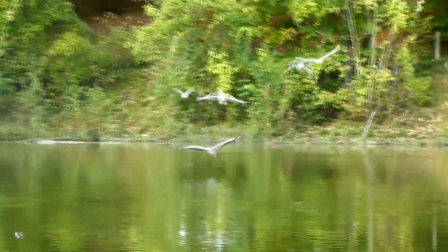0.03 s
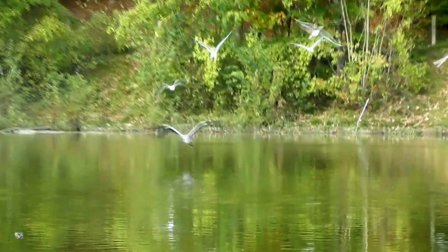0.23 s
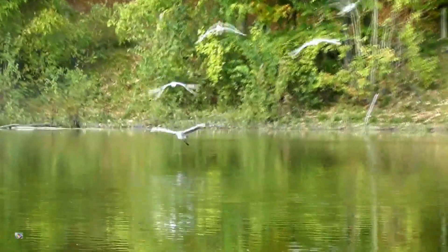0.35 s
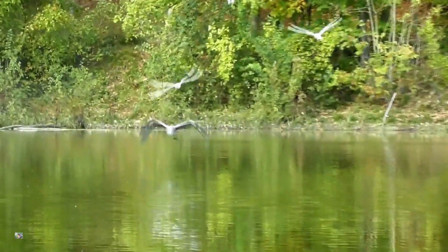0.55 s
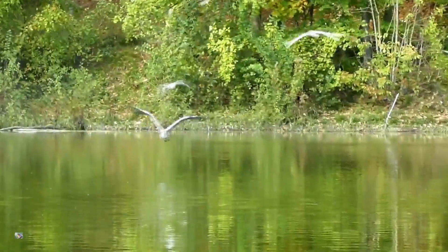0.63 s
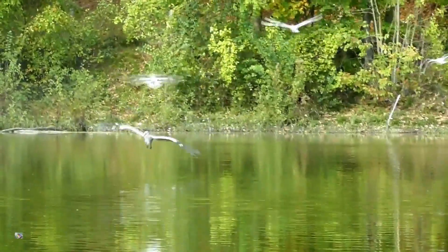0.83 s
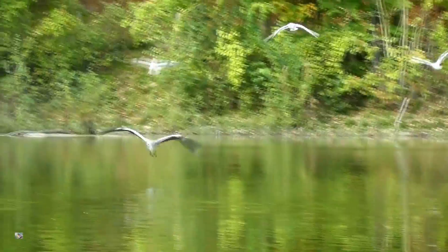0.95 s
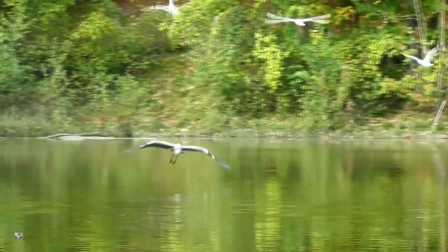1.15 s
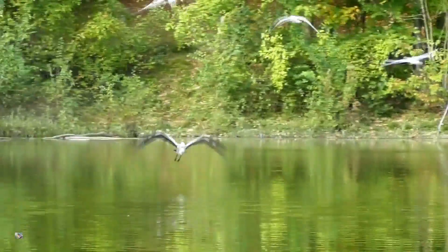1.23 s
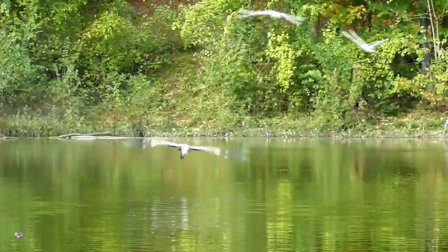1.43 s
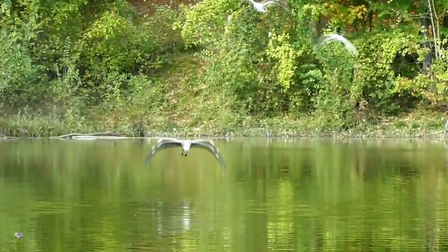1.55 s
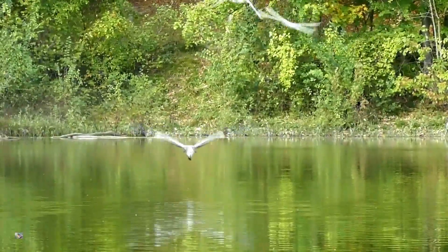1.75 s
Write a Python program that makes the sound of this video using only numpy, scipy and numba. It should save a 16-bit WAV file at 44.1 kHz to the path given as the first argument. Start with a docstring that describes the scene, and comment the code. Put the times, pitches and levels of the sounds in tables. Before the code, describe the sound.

Two harsh heron calls sound at a wooded pond, centred before the microphone: first a squealing, croaking screech, then a louder rasping squawk. A soft echo fades, leaving a low outdoor rumble and faint distant chirps.

```python
"""A pond among trees, where a heron calls twice. A thin squeal breaks into a throbbing screech over a
rattling croak, then a louder, harsh squawk follows. The squeal is a breathy harmonic note; the rough
sounds are pulses of the vocal membranes ringing the throat. The trees scatter the voice and the far
bank sends back a dull echo. Small birds chirp far off over a low rumble; the camera ticks faintly."""
import sys
import numpy as np
from scipy import signal
from scipy.fft import rfft, irfft
from scipy.io import wavfile
from scipy.ndimage import uniform_filter1d
from numba import njit

SR = 44100
rng = np.random.default_rng(int(sys.argv[2]) if len(sys.argv) > 2 else 0)


def digitize_waveform(pressure):
    """Quantize a signal to 16-bit integers and store it at the path in sys.argv[1].

    Rows of a 2-D input are taken as channels; values are limited to [-1, 1].
    """
    field = np.atleast_2d(pressure).T
    bounded = np.clip(field, -1, 1)
    quanta = np.round(bounded * 32767).astype(np.int16)
    wavfile.write(sys.argv[1], SR, quanta)


N = 79380
T = np.arange(N) / SR

# opening squeal: time_s, pitch_hz, level_db, jitter_ratio
SQUEAL = [(.168, 990, -60.5, 0.013), (.192, 1037, -50.5, 0.018), (.202, 1123, -46.5, .012),
          (.222, 1136, -48, 0.015), (.238, 1160, -51, 0.055), (.275, 1160, -49.5, 0.071),
          (.29, 1150, -59, 0.037)]
# throat EQ on the squeal's note and on its breath: freq_hz, gain_db
SQUEAL_EQ = [(1000, -5), (2300, 3.5), (3450, -1), (4100, -16), (4560, 6), (5300, -22), (6850, 2.5),
             (9200, -13)]
BREATH_EQ = [(700, -10), (1100, 4), (1600, -9.5), (2300, 3), (3000, -7), (4300, -34)]

# membrane pulses of the screech: time_s, rate_hz, jitter_ratio
SCREECH_PULSES = [(.2, 1139, 0.041), (.28, 1104, .1), (.35, 580.1, .09), (.385, 588.3, 0.029),
                  (.42, 607, 0.014), (.46, 589, 0.011), (.52, 570.3, 0.023), (.56, 549, 0.037)]
# the screech's three throat resonances: time_s, centre_hz, level_db
SCREECH_LOW = [(.23, 4330, -56), (.27, 4040, -51), (.35, 3980, -41), (.41, 3920, -40), (.46, 3950, -37),
               (.51, 3600, -40), (.56, 3500, -44), (.6, 3360, -62)]
SCREECH_MID = [(0.196, 6900, -45), (.213, 7230, -43), (.24, 6800, -42.5), (.28, 6500, -46.5),
               (.34, 6450, -43), (.42, 6340, -43.5), (.5, 5600, -53), (.56, 5760, -74)]
SCREECH_TOP = [(.28, 10600, -64), (.34, 10000, -54.5), (.41, 8970, -48.5), (.46, 8140, -47),
               (.52, 7850, -47), (.58, 7000, -57.5)]
# the beak's roll-off on the screech: freq_hz, gain_db
BEAK_EQ = [(1000, 2), (11000, -0.5), (15000, -13)]
# swell of the screech's clear overtones: time_s, level_db
OVERTONE_SWELL = [(.35, -50), (.385, -41.5), (.42, -38), (.46, -40.5), (.5, -40.5), (.53, -50), (.57, -53)]

# three-band envelopes of croak and squawk: time_s, low_db, high_db, treble_db
CROAK_BANDS = [(.275, -66, -70, -68), (.289, -45, -41, -46), (.34, -44.5, -41, -44.5),
               (.42, -47.5, -41.5, -50), (.5, -44.5, -46.5, -55), (.62, -52.5, -42, -54),
               (.7, -53, -45.5, -55.5), (.72, -54, -49, -65.5), (.84, -50, -51.5, -61.5)]
SQUAWK_BANDS = [(.8, -50, -65, -75), (.83, -51, -43, -55), (.86, -45.5, -40.5, -56),
                (.885, -45.5, -34, -45.5), (.96, -45, -32, -43.5), (.988, -45.5, -29, -40.5),
                (1.02, -47, -31.5, -43.5), (1.05, -46, -26.5, -36.5), (1.115, -46, -33, -41),
                (1.16, -45, -38, -44.5), (1.18, -52, -49, -60), (1.2, -63, -69, -55)]
# throat EQ of those bands (low to about 2 kHz, high to about 5 kHz, shared treble): freq_hz, gain_db
CROAK_LOW_EQ = [(280, -31.5), (420, -15), (1150, -1.5), (1600, -15)]
CROAK_HIGH_EQ = [(1600, -3.5), (1900, -1.5), (2350, 1.5), (2700, -4), (3100, -3), (3450, 2.5), (3800, -5),
                 (4600, -11)]
SQUAWK_LOW_EQ = [(200, -26.5), (300, -23.5), (550, -10), (1950, -13.5)]
SQUAWK_HIGH_EQ = [(1900, -17.5), (2120, -6.5), (2300, 4), (2460, -1.5), (2720, 3.5), (3270, 3.5), (3550, 0),
                  (4000, -7.5), (4200, 3), (4600, -28)]
TREBLE_EQ = [(4700, 1), (5300, -3.5), (5900, 3), (6900, 6), (8200, -2.5), (9500, -18), (11000, -22.5),
             (15000, -36)]
# rattle of the vocal membranes: time_s, rate_hz, jitter_ratio
CROAK_RATTLE = [(0.301, 265, .13), (.55, 255, .1), (.65, 305, .09)]
SQUAWK_RATTLE = [(.9, 340.6, 0.17), (.98, 280.9, .13), (1.128, 269.7, .13)]
# narrow throat resonances, one list for each: time_s, centre_hz, level_db
CROAK_RINGS = [
    [(.28, 902, -49), (.345, 978, -40.5), (.43, 922, -47.5), (.57, 915, -45.5), (.69, 893, -49.5),
     (.81, 976, -57.5)],
]
SQUAWK_RINGS = [
    [(.81, 1008, -47), (.93, 943, -41), (1.04, 922, -38.5), (1.09, 984, -41.5), (1.16, 960, -46.5),
     (1.18, 770, -43), (1.196, 617, -62)],
    [(.85, 1310, -56), (.925, 1300, -38), (1.015, 1250, -40.5), (1.06, 1394, -34.5), (1.125, 1250, -37.5),
     (1.19, 1100, -45)],
    [(.82, 2040, -45.5), (.87, 2040, -45.5), (.93, 1700, -39), (.98, 1860, -42.5), (1.07, 1640, -37.5),
     (1.17, 1570, -44)],
    [(.82, 3340, -47.5), (.99, 3420, -30.5), (1.17, 3500, -43)],
]
# brief throat resonances: peak_s, swell_s, fade_s, centre_hz, width_hz, level_db
GROWLS = [(0.673, 0.18, 0.0434, 606, 176, -50), (1.108, 0.015, 0.028, 700, 300, -49),
          (1.124, 0.05, 0.0061, 8600, 1200, -49.5)]

# bright scatter off the leaves: freq_hz, gain_db
LEAF_EQ = [(1200, -5), (4000, 4.5), (4900, 14.5), (5600, 10), (6500, 5.5), (8000, -4), (14000, -16)]
# small birds' chirps: start_s, length_s, first_hz, middle_hz, last_hz, level_db
CHIRPS = [(-.02, 0.09, 7200, 6540, 6270, -73), (0.012, 0.028, 3480, 3520, 3480, -58),
          (0.661, 0.11, 7250, 7050, 6850, -59), (1.425, 0.0313, 7660, 8300, 7310, -63),
          (1.737, 0.063, 8070, 8040, 7700, -70.5)]
# tone of the outdoor air: freq_hz, gain_db
AIR_EQ = [(25, -9), (50, -6.5), (75, 2), (100, -3.5), (140, 0), (220, -8.5), (290, -23), (500, -9.5),
          (950, -14.5), (1500, -23.5), (2800, -55), (3300, -19), (3500, -41), (3800, -49), (4500, -25),
          (5000, -58), (6800, -37), (10000, -32), (15000, -37.5)]
# tone of the camera's ticks: freq_hz, gain_db
TICK_EQ = [(1200, -33), (1800, 3.5), (4000, -17), (4550, -3.5), (4900, -16), (6300, -15), (9000, -17)]

THROB_HZ, THROB_DIP_S = 59.76, 0.25


def heron():
    """Both calls, dry: squeal, screech and croak layered into the first, the squawk as the second."""
    croak = rasp(CROAK_BANDS, CROAK_LOW_EQ, CROAK_HIGH_EQ, CROAK_RATTLE, CROAK_RINGS, widths_hz=[148])
    squawk = rasp(SQUAWK_BANDS, SQUAWK_LOW_EQ, SQUAWK_HIGH_EQ, SQUAWK_RATTLE, SQUAWK_RINGS,
                  widths_hz=[182, 197, 220, 347])
    return squeal() + screech() + overtones() + croak + squawk + growls()


def rasp(bands, low_eq, high_eq, rattle, resonances, widths_hz):
    """Membrane slaps drive the broad body of the throat and its narrow, moving resonances."""
    source = slaps(rattle)
    spread = windpipe(source)
    layers = eq(spread, low_eq), eq(spread, high_eq), eq(source, TREBLE_EQ)
    body = sum(unit(layer) * envelope(bands, column) for column, layer in enumerate(layers, 1))
    return body + throat_rings(spread, resonances, widths_hz)


def squeal():
    """A thin, breathy harmonic note rises through the throat's resonances and turns hoarse."""
    pitch_hz = curve(SQUEAL, 1) * pitch_sag()
    hoarseness = 1 + curve(SQUEAL, 3) * waver(1400)
    phase = phase_of(pitch_hz * hoarseness)
    note = unit(eq(sum(np.sin(k * phase) for k in range(1, 9)), SQUEAL_EQ))
    breath = unit(eq(rng.standard_normal(N), BREATH_EQ))
    return (note + .55 * breath) * envelope(SQUEAL, 2) * np.sqrt(throb())


def screech():
    """Fast pulses throb through three sinking throat resonances; the beak softens the top."""
    source = membranes(SCREECH_PULSES, scatter_db=.5, puff_gain=.63)
    voice = throat_rings(source, (SCREECH_LOW, SCREECH_MID, SCREECH_TOP), widths_hz=(920, 1180, 1400))
    return eq(voice * throb(), BEAK_EQ)


def overtones(jitter=.0126):
    """At its height the screech locks into two clear, arching harmonics of its pulse rate."""
    phase = phase_of(curve(SCREECH_PULSES, 1) * pitch_sag() * (1 + jitter * waver(840)))
    tones = undb(.15) * np.sin(6 * phase) + undb(-1.6) * np.sin(7 * phase)
    return unit(tones) * envelope(OVERTONE_SWELL, 1) * throb()


def growls():
    """Throat resonances flare late in the calls: a low growl in each, a bright edge on the squawk."""
    out = 0
    for peak_s, swell_s, fade_s, centre_hz, width_hz, level_db in GROWLS:
        ring = resonance(slaps(CROAK_RATTLE), np.full(N, float(centre_hz)), width_hz)
        swell = bell(T - peak_s, np.where(T < peak_s, swell_s, fade_s))
        out += undb(level_db) * ring * swell
    return out


def slaps(rattle):
    """The slow rattle of the slack membranes, throbbing while the screech lasts."""
    pinch = np.where(T < SCREECH_PULSES[-1][0], np.sqrt(throb()), 1)
    return membranes(rattle, scatter_db=3.5, puff_gain=.72) * pinch


def membranes(pulse_table, scatter_db, puff_gain, puff_cycles=.97):
    """Uneven slaps of the vocal membranes, each followed by a puff of air."""
    timing, force = rng.standard_normal((N // 10, 2)).T
    strength = undb(scatter_db * np.clip(force, -2, 2))
    pulses, phase = pulse_train(curve(pulse_table, 1), curve(pulse_table, 2), timing, strength)
    puffs = np.exp(-phase / puff_cycles) * rng.standard_normal(N)
    return unit(pulses) + puff_gain * unit(puffs)


@njit
def pulse_train(rate_hz, jitter, timing, strength):
    """One pulse per membrane cycle, each cycle its own length; also returns the phase in cycles."""
    pulses, phase = np.zeros(N), np.empty(N)
    position, count = 0., 0
    for i in range(N):
        position += rate_hz[i] * np.exp(jitter[i] * timing[count]) / SR
        if position >= 1:
            position, count = position - 1, count + 1
            pulses[i] = strength[count]
        phase[i] = position
    return pulses, phase


def throb(depth=.74, sharpness=4.2):
    """Tremolo: the voice is pinched about sixty times a second."""
    pinch = (.5 + .5 * np.cos(2 * np.pi * THROB_HZ * (T - THROB_DIP_S))) ** sharpness
    return unit(1 - depth * pinch)


def pitch_sag(depth=.008):
    """The pitch sags a little at every pinch of the throb."""
    return 1 - depth * np.cos(2 * np.pi * THROB_HZ * (T - THROB_DIP_S))


def windpipe(x, delay_s=.00032, bounce=.69):
    """Each slap bounces along the windpipe, an all-pass that smears it without colouring it."""
    loop = np.r_[1, np.zeros(int(delay_s * SR) - 1), -bounce]
    return signal.lfilter(loop[::-1], loop, x)


def throat_rings(source, tables, widths_hz, quiver=.019):
    """Throat resonances, each gliding, quivering and swelling on its own."""
    out = 0
    for table, width_hz in zip(tables, widths_hz):
        centre_hz = curve(table, 1) * (1 + quiver * waver(40))
        out += resonance(source, centre_hz, width_hz) * envelope(table, 2)
    return out


def woods(voice, scatter_db=-18, bank_db=-21.5):
    """Reverb return: diffuse scatter from the trees and a late, dull echo off the far bank."""
    trees, leaves, bank = rng.standard_normal((3, N))
    trees = lowpass(trees, 3240) * decay(t60_s=.84)
    leaves = eq(leaves, LEAF_EQ) * decay(t60_s=.66)
    bank = lowpass(unit(bank * bell(T - .39, spread_s=.17)), 1430)
    response = undb(scatter_db) * unit(trees + .5 * leaves) + undb(bank_db) * bank
    return reverb(voice, response)


def small_birds(foliage_db=-5):
    """Short, gliding whistles far off, smeared by twigs and foliage."""
    whistles = 0
    for start_s, length_s, first_hz, middle_hz, last_hz, level_db in CHIRPS:
        progress = np.clip((T - start_s) / length_s, 0, 1)
        glide = np.polyfit([0, .5, 1], [first_hz, middle_hz, last_hz], 2)
        pitch_hz = np.polyval(glide, progress) * (1 + .02 * waver(690))
        swell = undb(level_db) * np.sqrt(2) * np.sin(np.pi * progress)
        whistles += swell * np.sin(phase_of(pitch_hz))
    foliage = unit(rng.standard_normal(N) * np.exp(-T / .17))
    twigs = unit(rng.standard_normal(N) * np.exp(-T / .006))
    return reverb(whistles, twigs + undb(foliage_db) * foliage)


def outdoor_air(rumble_db=-57.5, side_db=-16, hiss_db=-95):
    """The bed: a low, nearly mono rumble, with a faint separate hiss in each ear."""
    mid, side = (unit(eq(rng.standard_normal(N), AIR_EQ)) for _ in range(2))
    stereo = mid + undb(side_db) * side * np.array([[1], [-1]])
    rumble = undb(rumble_db + .5 * waver(18)) * stereo
    return rumble + undb(hiss_db) * rng.standard_normal((2, N))


def camera(rate_hz=50, first_s=.013, level_db=-70.5):
    """Tiny, evenly spaced noise bursts: a faint ticking inside the camera."""
    from_tick_s = (((T - first_s) * rate_hz + .5) % 1 - .5) / rate_hz
    ticks = rng.standard_normal(N) * bell(from_tick_s, spread_s=.0022)
    return undb(level_db) * unit(eq(ticks, TICK_EQ))


def undb(db):
    """Decibels to gain."""
    return 10 ** (np.asarray(db) / 20)


def unit(x):
    """Scale to rms 1."""
    return x / np.sqrt(np.mean(x ** 2))


def curve(table, column):
    """One column of a table over time."""
    rows = np.array(table)
    return np.interp(T, rows[:, 0], rows[:, column])


def envelope(table, column):
    """Gain from a dB column, softly gated to the table's time span."""
    gate = 1. * ((T > table[0][0]) & (T < table[-1][0]))
    return undb(curve(table, column)) * uniform_filter1d(gate, size=200)


def bell(offset_s, spread_s):
    """Gaussian swell, peaking at zero offset."""
    return np.exp(-.5 * (offset_s / spread_s) ** 2)


def decay(t60_s):
    """A tail that falls 60 dB in t60_s."""
    return 1000 ** (-T / t60_s)


def phase_of(hz):
    """Running phase of a moving pitch, in radians."""
    return 2 * np.pi * np.cumsum(hz) / SR


def waver(hz):
    """Smooth random modulation with rms 1."""
    span = int(SR / hz)
    return unit(uniform_filter1d(uniform_filter1d(rng.standard_normal(N), span), span))


def reverb(x, response):
    """Convolve; a response of rms 1 gives about unity gain."""
    return signal.fftconvolve(x, response)[:N] / np.sqrt(N)


def lowpass(x, hz):
    """Gentle treble roll-off."""
    return signal.sosfilt(signal.butter(2, hz, fs=SR, output="sos"), x)


def eq(x, points, size=8192):
    """Minimum-phase EQ through the points; beyond them it drops 60 dB an octave, by 40 dB at most."""
    hz, db = np.array(points).T
    octaves, knots = np.log2(np.fft.rfftfreq(size, 1 / SR) + 1), np.log2(hz)
    outside = np.abs(octaves - np.clip(octaves, knots[0], knots[-1]))
    gain_db = np.interp(octaves, knots, db) - np.minimum(60 * outside, 40)
    cepstrum = irfft(np.log(undb(gain_db)))
    cepstrum[1:size // 2] *= 2
    cepstrum[size // 2 + 1:] = 0
    response = irfft(np.exp(rfft(cepstrum)))
    return irfft(rfft(x) * rfft(response, N), N)


def resonance(x, centre_hz, width_hz):
    """Two band-passes in series, scaled to rms 1."""
    return unit(bandpass(bandpass(x, centre_hz, width_hz), centre_hz, width_hz))


@njit
def bandpass(x, centre_hz, width_hz):
    """State-variable band-pass with a moving centre."""
    out, band_state, low_state = np.empty(N), 0., 0.
    for i in range(N):
        tuning = np.tan(np.pi * centre_hz[i] / SR)
        damping = np.pi * width_hz / SR * (1 + tuning * tuning) / tuning
        band = (band_state + tuning * (x[i] - low_state)) / (1 + tuning * (tuning + damping))
        band_state = 2 * band - band_state
        low_state += 2 * tuning * band
        out[i] = damping * band
    return out


def scene():
    """The heron dead centre, with the pond's ambience behind it."""
    voice = heron()
    return voice + woods(voice) + small_birds() + camera() + outdoor_air()


def record(dry, notch_hz=4734, notch_width_hz=230, top_hz=15700):
    """The microphone has a narrow dead spot, and the recorder cuts the top."""
    notched = signal.lfilter(*signal.iirnotch(notch_hz, notch_hz / notch_width_hz, fs=SR), dry)
    return signal.sosfilt(signal.ellip(10, .2, 70, top_hz, fs=SR, output="sos"), notched)


dry = scene()
out = record(dry)
digitize_waveform(out)
```